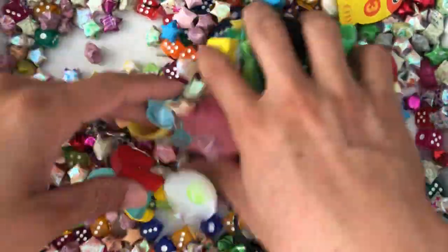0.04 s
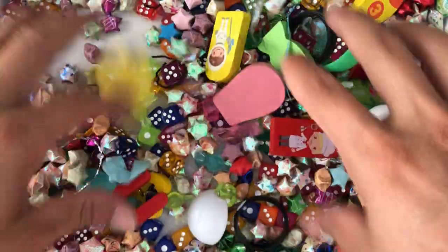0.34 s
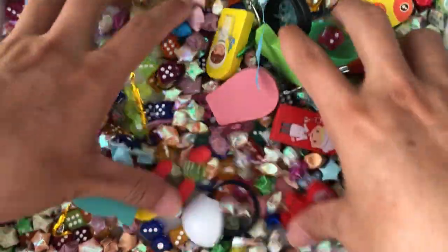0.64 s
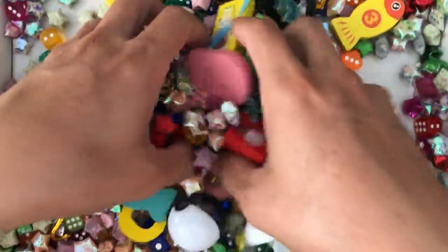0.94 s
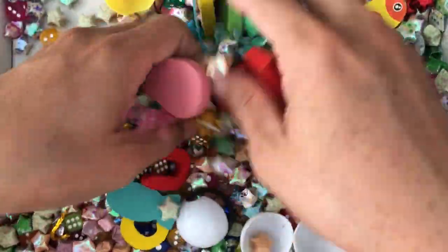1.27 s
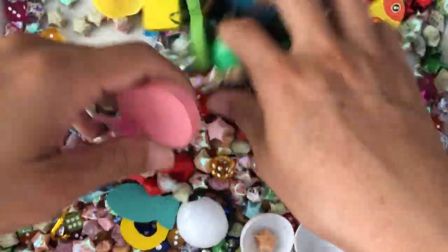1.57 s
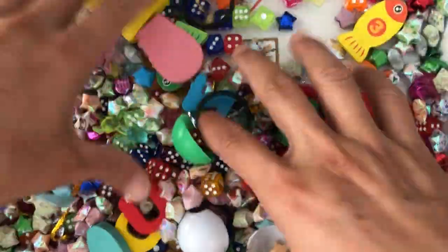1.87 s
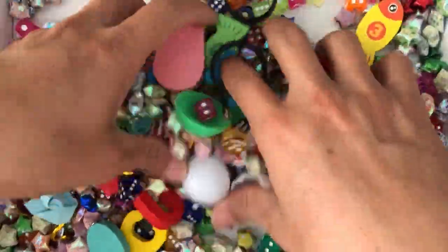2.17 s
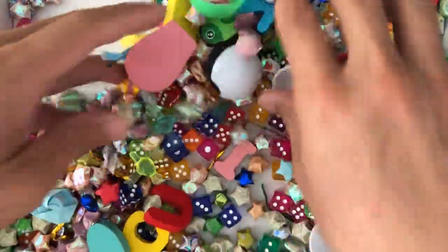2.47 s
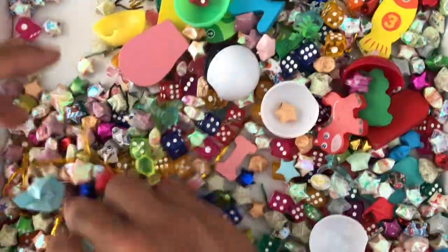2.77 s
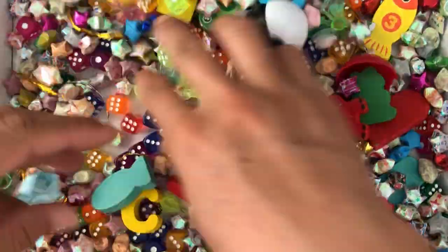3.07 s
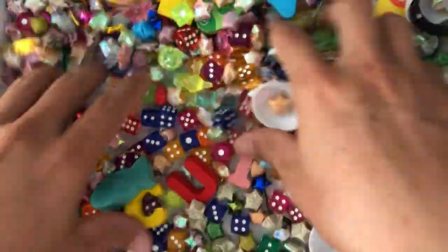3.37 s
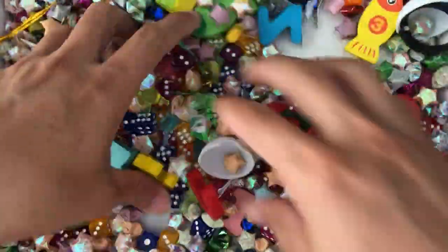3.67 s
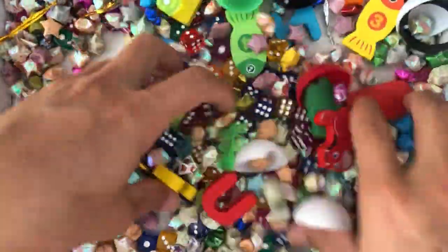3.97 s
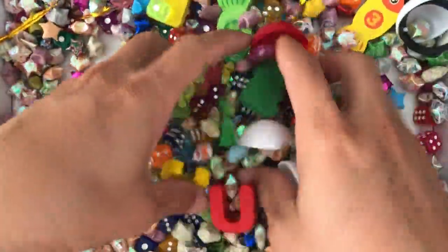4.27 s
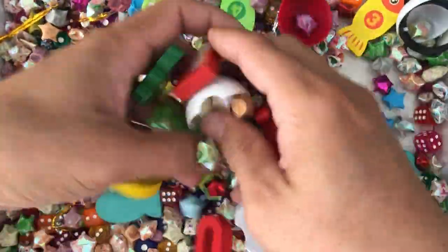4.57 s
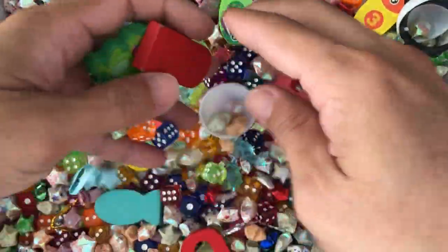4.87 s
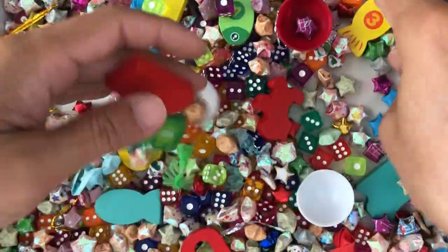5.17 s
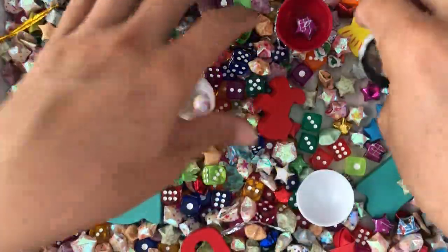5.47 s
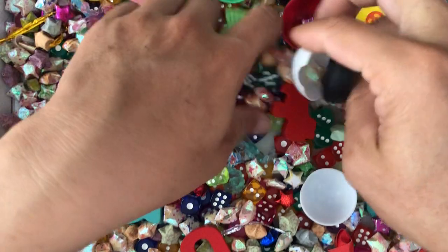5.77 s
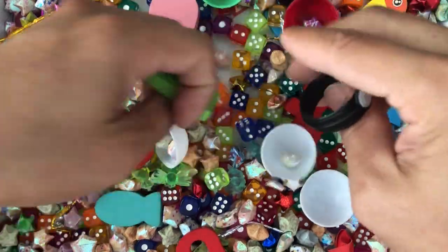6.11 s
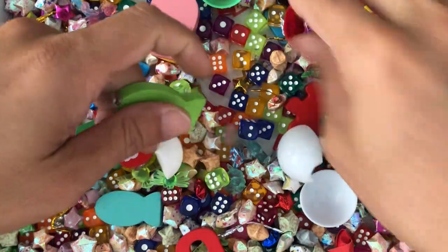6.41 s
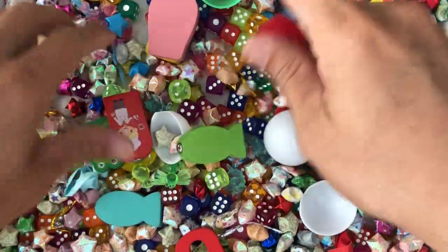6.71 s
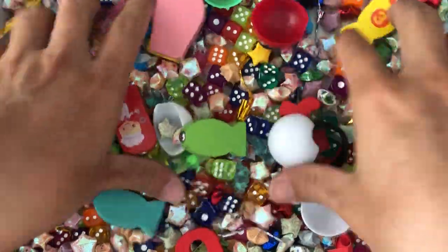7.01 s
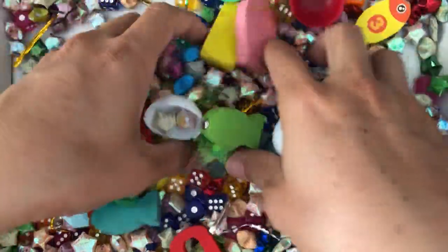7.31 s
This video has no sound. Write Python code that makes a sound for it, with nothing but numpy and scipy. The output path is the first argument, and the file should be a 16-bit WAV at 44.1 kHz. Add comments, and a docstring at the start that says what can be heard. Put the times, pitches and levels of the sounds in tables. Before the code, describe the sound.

Close, continuous rustling and clicking as small plastic trinkets and folded paper are rummaged through by hand in a shallow tray.

```python
"""Two hands stir folded paper stars, dice and plastic toys in a shallow tray, close to the microphone.
From the first stroke on, paper crinkles, plastic patters and clicks, and falling pieces knock on the tray.
At 1.8 s a hard piece pings and bounces. The clicks crowd together from 4.3 to 5.4 s.
Plastic squeaks faintly at 6.4 s; the last stroke crunches a star at 7.4 s.
A small room with a low ventilation drone lies behind throughout."""
import sys
import numpy as np
from scipy import signal
from scipy.io import wavfile
from scipy.ndimage import uniform_filter1d

SR = 44100
rng = np.random.default_rng(int(sys.argv[2]) if len(sys.argv) > 2 else 0)


def to_wav(sig):
    """Store sig (one row per channel, or 1-D mono) as 16-bit WAV at the path in sys.argv[1].

    Samples outside -1..1 are clipped; the rate is SR.
    """
    pcm = np.clip(np.atleast_2d(sig), -1, 1) * 32767
    pcm = np.round(pcm).astype(np.int16)
    wavfile.write(sys.argv[1], SR, pcm.T)  # frames by channels


N = 328545
TIME_S = np.arange(N) / SR
USUAL_EFFORT_DB = -53
GRAZE_LEAD_S = .003

# finger strokes: (start [s], length [s], effort [dB], push against the tray [dB])
FINGER_STROKES = [(0.01, 0.172, -51.5, -47.5), (0.172, 0.07, -59, -51.5), (0.327, 0.11, -68.5, -53.5),
                  (0.441, 0.23, -54, -47.5), (0.685, 0.13, -46.5, -46), (0.814, 0.058, -49.5, -49.5),
                  (0.895, 0.099, -45.5, -47.5), (1.088, 0.04, -56.5, -55), (1.135, 0.1, -49, -51),
                  (1.303, 0.061, -47.5, -44.5), (1.441, 0.51, -51.5, -48.5), (1.617, 0.1, -43.5, -44),
                  (1.718, 0.81, -55, -49.5), (2.028, 0.14, -50.5, -49.5), (2.173, 0.226, -48, -49),
                  (2.419, 0.05, -53, -50), (2.555, 0.06, -62, -52), (2.736, 0.05, -74, -54),
                  (2.811, 0.23, -51.5, -50.5), (2.956, 0.099, -52.5, -50.5), (3.133, 0.11, -65.5, -56.5),
                  (3.272, 0.1, -58.5, -53.5), (3.36, 0.09, -47, -48.5), (3.504, 0.075, -45, -52),
                  (3.577, 0.12, -50.5, -48), (3.733, 0.045, -60.5, -53.5), (3.907, 0.12, -48.5, -50.5),
                  (3.997, 0.17, -54, -47), (4.131, 0.099, -49.5, -47), (4.286, 0.14, -44.5, -45.5),
                  (4.438, 0.07, -47.5, -47), (4.602, 0.11, -57, -48), (4.745, 0.27, -54.5, -49),
                  (5.094, 0.077, -64, -58), (5.203, 0.13, -58, -56), (5.485, 0.31, -61, -57),
                  (5.711, 0.13, -49.5, -53), (5.887, 0.09, -53, -57.5), (6.067, 0.084, -64.5, -51.5),
                  (6.19, 0.16, -77.5, -54.5), (6.536, 0.042, -56, -53.5), (6.616, 0.083, -63, -54),
                  (6.805, 0.18, -67.5, -57), (6.957, 0.092, -62, -55.5), (7.079, 0.085, -48, -50),
                  (7.22, 0.66, -51, -47)]
# tray jostled under the heap: (frequency [Hz], gain [dB])
JOSTLE_SPECTRUM = [(100, -11), (330, -15.5), (410, -7.5), (490, -4.5), (560, -4), (610, 1.5), (690, -3.5),
                   (820, 3.5), (1100, 1.5), (1250, -1), (1400, -4.5), (1900, -11.5), (2600, -4.5),
                   (5000, -77)]
# pattering plastic: (frequency [Hz], gain [dB])
PATTER_SPECTRUM = [(600, -27), (1400, 3.5), (2200, -6.5), (2550, 4), (3100, 1), (3800, 0), (4800, -2.5),
                   (7000, -12), (16000, -24)]
# crinkling paper: (frequency [Hz], gain [dB])
CRINKLE_SPECTRUM = [(1200, -8), (3000, -13.5), (5000, -6.5), (6500, -3.5), (8500, -4), (11000, -8),
                    (15000, -11.5), (16000, -12.5)]
# loudest plastic collisions: (time [s], level [dB], pitch [Hz], chatter t60 [s])
PLASTIC_CLICKS = [(0.031, -40, 3000, 0.0048), (0.3644, -40, 3670, 0.0052), (0.468, -39.5, 3500, 0.0074),
                  (0.53, -39.5, 2920, 0.006), (0.6406, -41.5, 2910, 0.0053), (1.13, -42.5, 5550, 0.014),
                  (1.35, -38, 3480, 0.0062), (1.358, -38, 2920, 0.019), (1.4468, -44, 2640, 0.0046),
                  (1.468, -41, 3020, 0.006), (1.666, -32.5, 2600, 0.014), (1.7727, -33, 3300, 0.022),
                  (1.8384, -28, 5600, 0.011), (1.8399, -28.5, 4900, 0.0055), (1.921, -42, 3900, 0.006),
                  (2.3308, -35.5, 4830, 0.022), (2.3922, -37.5, 3900, 0.024), (2.551, -45, 3220, 0.01),
                  (2.5636, -36.5, 3470, 0.0055), (2.5806, -36.5, 3450, 0.006), (2.8543, -45, 2700, 0.011),
                  (3.1399, -44.5, 3220, 0.011), (3.2135, -42, 3030, 0.029), (3.266, -42, 3480, 0.019),
                  (3.6751, -40, 3630, 0.0044), (3.6925, -39, 2930, 0.006), (3.7467, -34, 2630, 0.027),
                  (4.3163, -37, 5800, 0.044), (4.4025, -32, 6100, 0.025), (4.4261, -34.5, 6240, 0.082),
                  (4.6549, -35, 6000, 0.017), (4.6979, -39.5, 4230, 0.026), (4.7608, -35, 5600, 0.0034),
                  (4.7664, -43, 4400, 0.0063), (4.7998, -37.5, 4240, 0.0071), (4.8439, -33.5, 3600, 0.0053),
                  (4.8635, -34, 3630, 0.0058), (4.8712, -39.5, 5100, 0.012), (4.921, -37, 3870, 0.0044),
                  (4.9636, -25, 3560, 0.0066), (4.981, -42, 3390, 0.011), (5.085, -39, 3800, 0.0018),
                  (5.0995, -31.5, 3870, 0.0025), (5.1228, -41, 3700, 0.012), (5.1384, -39, 4200, 0.0069),
                  (5.1667, -40, 3740, 0.0056), (5.1789, -50, 4200, 0.005), (5.191, -26.5, 3930, 0.012),
                  (5.2515, -37.5, 4080, 0.0018), (5.295, -41.5, 5330, 0.039), (5.35, -44, 4560, 0.018),
                  (5.6733, -38, 3160, 0.014), (5.8049, -35, 3860, 0.014), (5.9758, -37.5, 4040, 0.0068),
                  (6.0732, -27, 3460, 0.0095), (6.0738, -39, 2100, 0.008), (6.2903, -37, 3420, 0.0066),
                  (6.3162, -40.5, 3050, 0.019), (6.492, -41.5, 3840, 0.0023), (6.5813, -45.5, 3360, 0.0091),
                  (6.5919, -43.5, 3150, 0.0068), (6.649, -36.5, 3260, 0.003), (6.7, -47, 3610, 0.02),
                  (6.9833, -40, 3600, 0.003)]
# radiation of small plastic pieces: (frequency [Hz], gain [dB])
PLASTIC_SPECTRUM = [(200, -2), (1400, 6), (2100, 0.5), (2800, 1.5), (4700, -0.5), (5600, -0.5)]
# sharp contact: (frequency [Hz], gain [dB])
CONTACT_SPECTRUM = [(200, -12), (1000, -1.5), (4000, -6.5), (7500, -5), (11000, -5.5), (16000, -5.5)]
# heaviest drops on the tray: (time [s], relative level [dB], ring centre [Hz])
TRAY_KNOCKS = [(0.0573, -39.5, 750), (0.1332, -45, 980), (0.5298, -40.5, 1180), (0.7374, -36.5, 820),
               (1.3501, -36, 1080), (1.3578, -34, 1070), (1.4972, -37.5, 1010), (1.7246, -40, 1030),
               (2.6014, -41.5, 1260), (2.7987, -35.5, 556), (2.8538, -38.5, 840), (2.8794, -40, 940),
               (2.9961, -32, 750), (3.0557, -41.5, 730), (3.2915, -43, 664), (3.748, -37.5, 1240),
               (4.2238, -42, 980), (4.3907, -41, 1010), (4.4228, -38, 637), (4.4893, -37.5, 930),
               (4.6495, -33.5, 696), (4.6565, -31.5, 700), (4.6992, -33.5, 700), (4.8434, -41, 1160),
               (4.9087, -39.5, 1300), (4.9469, -38, 1040), (6.0733, -39.5, 930), (6.7872, -43.5, 696)]
# tray modes: (frequency [Hz], gain [dB], t60 [s])
TRAY_RESONANCES = [(389, -10.5, 0.053), (589, 3.5, 0.029), (805, -3.5, 0.048), (930, 5, 0.016),
                   (1160, -5, 0.024), (1404, 6.5, 0.017), (2070, -8, 0.02)]
# hard piece, struck and bouncing: (time [s], relative level [dB])
PING_BOUNCES = [(1.8386, -17), (1.8512, -38), (1.855, -47), (1.861, -30)]
# its modes: (frequency [Hz], gain [dB], t60 [s])
PING_MODES = [(4100, 0.5, 0.015), (6240, -2.5, 0.029), (6400, -22, 0.076), (7750, -6, 0.023)]
# loudest stars crushed or dragged: (time [s], relative level [dB], length [s])
STAR_CRUNCHES = [(0.6976, -43, 0.007), (0.777, -39.5, 0.0048), (1.6183, -37, 0.013), (1.7307, -45, 0.0086),
                 (2.8918, -40.5, 0.011), (3.5308, -47, 0.007), (4.826, -40, 0.005), (6.5324, -46, 0.009),
                 (7.372, -38, 0.04)]
# a whole star giving way: (frequency [Hz], gain [dB])
CRUNCH_SPECTRUM = [(800, -32), (2500, -6.5), (4500, -1), (6700, 5), (8500, 2), (11000, -1), (16000, -12)]
# tiny hard beads meeting: (time [s], level [dB])
BEAD_TICKS = [(0.031, -40), (0.124, -38), (0.695, -36), (1.2508, -40), (2.6012, -42), (3.2142, -41.5),
              (3.232, -40), (3.268, -42.5), (3.386, -33.5), (3.5052, -37), (4.4377, -39), (5.0176, -35),
              (5.098, -53), (5.1991, -38.5), (7.225, -40.5), (7.2395, -36)]
# plastic rubbing on plastic: (time [s], length [s], level [dB], pitch [Hz])
RUB_SQUEAK = (6.435, 0.055, -63, 1781)
# room decay: (frequency [Hz], t60 [s])
ROOM_DECAY = [(200, 0.25), (1000, 0.74), (4000, 0.071), (14000, 0.075)]
# ventilation: (frequency [Hz], gain [dB])
DRONE_SPECTRUM = [(40, -15), (100, -20.5), (135, -4), (165, 4), (225, -6), (275, 0), (335, -16), (400, -4),
                  (520, -14.5), (750, -6.5), (1200, -16.5), (2200, -42), (6000, -32), (16000, -34)]
# deep rumble: (frequency [Hz], gain [dB])
RUMBLE_SPECTRUM = [(22, -43), (30, -32), (40, -5.5), (47, 7), (55, 4), (66, -11), (100, 0.5), (130, -4),
                   (200, -29), (600, -75)]
# its envelope: (time [s], level [dB])
RUMBLE_LEVELS = [(0, -74), (0.4, -64.5), (1.1, -78), (1.35, -61), (1.8, -68.5), (2.7, -60), (2.95, -72),
                 (3.3, -64.5), (3.98, -64), (4.1, -76), (4.6, -63.5), (6.75, -64), (6.95, -77), (7.15, -78),
                 (7.3, -65)]


def heap(jostle_db, patter_db, crinkle_db):
    """Three contact streams: bumps on the tray, plastic taps, snapping paper."""
    bumps = contacts(jostle_db, rate_per_s=1000, slips_per_s=100, slip_db=1, slip_s=.002, creep=1.7,
                     spread_db=2, band_hz=(335, 2110), cycles=4.35)
    taps = contacts(patter_db, rate_per_s=1200, slips_per_s=120, slip_db=3.5, slip_s=.00067, creep=2.5,
                    spread_db=3, band_hz=(1334, 7770), cycles=25)
    folds, creases = (
        unit(contacts(crinkle_db, rate_per_s=2500, slips_per_s=110, slip_db=3.5, slip_s=.00088,
                      creep=1.9, spread_db=6, band_hz=band_hz, cycles=6.3))
        for band_hz in [(3000, 8900), (9500, 18600)])
    # gentle strokes lose the finest creases first
    dulling_db = .078 * np.minimum(crinkle_db - USUAL_EFFORT_DB, 0)
    snaps = folds + creases * amp(dulling_db)
    return (amp(.53) * follow(colour(bumps, JOSTLE_SPECTRUM), jostle_db)
            + amp(-1.56) * follow(colour(taps, PATTER_SPECTRUM), patter_db)
            + amp(.8) * follow(colour(snaps, CRINKLE_SPECTRUM), crinkle_db))


def contacts(level_db, rate_per_s, slips_per_s, slip_db, slip_s, creep, spread_db, band_hz, cycles):
    """Small pieces creep and slip in flurries of ringing contacts; hand pace scales the base rates."""
    pieces, t = 48, TIME_S[:SR // 50]
    pace = unit(amp(level_db)) ** .8
    slip_starts = rng.random(N) < slips_per_s * pace / SR
    slip_sizes = amp(slip_db * np.minimum(rng.exponential(1, N), 3))
    slips = signal.oaconvolve(slip_starts * slip_sizes, t * np.exp(-t / slip_s))[:N]
    motion = creep * pace ** .65 + unit(slips)
    sizes = motion * amp(spread_db * np.minimum(rng.exponential(1, N), 4)) * rng.choice([-1, 1], N)
    hits = sizes * (rng.random(N) < rate_per_s * np.sqrt(pace) * motion / SR)
    piece, out = rng.integers(0, pieces, N), np.zeros(N)
    for k, hz in enumerate(np.linspace(*band_hz, pieces)):
        out += signal.oaconvolve(hits * (piece == k), burst(ring([(hz, 1, cycles / hz)], t)))[:N]
    return out


def hands():
    """Push drives the jostle, effort the crinkle and, less steeply, the patter."""
    _, _, effort_db, push_db = np.transpose(FINGER_STROKES)
    jostle_db = stroke_envelope(push_db, rest_db=-66, settle_db_per_s=130.5)
    crinkle_db = stroke_envelope(effort_db, rest_db=-90, settle_db_per_s=239)
    patter_db = -51 + .44 * (crinkle_db - USUAL_EFFORT_DB)
    return jostle_db, patter_db, crinkle_db


def stroke_envelope(peaks_db, rest_db, settle_db_per_s, bite_db_per_s=405, ease_db_per_s=9):
    """Level [dB]: each stroke bites, eases, then settles to the slight stir of resting hands."""
    t, level_db = TIME_S[::64], rest_db
    for (start_s, length_s, *_), peak_db in zip(FINGER_STROKES, peaks_db):
        bite_db = bite_db_per_s * np.maximum(start_s - t, 0)
        ease_db = ease_db_per_s * np.clip(t - start_s, 0, length_s)
        settle_db = settle_db_per_s * np.maximum(t - start_s - length_s, 0)
        level_db = np.maximum(level_db, peak_db - bite_db - ease_db - settle_db)
    return np.interp(TIME_S, t, level_db)


def plastic_clicks(rows, cycles=8, scatter=.03, graze_s=.00038, usual_db=-36.5, usual_hz=3800):
    """A hard contact spits treble and rings four quickly damped plastic modes."""
    out, t = np.zeros(N), TIME_S[:SR // 25]
    for time_s, db, hz, t60_s in rows:
        detune = np.exp(scatter * rng.standard_normal(4) * [1, 0, 1, 1])
        modes_hz = hz * np.array([.77, 1, 1.2, 1.6]) * detune
        shell = ring(zip(modes_hz, [-.43, .84, -.72, -.031], cycles / modes_hz), t)
        force = chatter(t, t60_s, graze_s, firmness=8)
        body = colour(signal.fftconvolve(force, shell), PLASTIC_SPECTRUM)
        crack = colour(chatter(t, t60_s + .003, graze_s, firmness=4), CONTACT_SPECTRUM)
        # harder blows and smaller, higher pieces spit more treble
        crack_db = -43.5 + .54 * (db - usual_db) + 11 * np.log2(hz / usual_hz)
        add(out, time_s - GRAZE_LEAD_S, amp(db) * burst(body))
        add(out, time_s - GRAZE_LEAD_S, amp(crack_db) * burst(crack))
    return out


def chatter(t, t60_s, graze_s, firmness):
    """Two surfaces graze, meet in one blow at GRAZE_LEAD_S and chatter to rest."""
    since_s = t - GRAZE_LEAD_S
    envelope = np.exp(np.minimum(since_s, 0) / graze_s) * amp(-60 * np.maximum(since_s, 0) / t60_s)
    blow = firmness * signal.unit_impulse(len(t), np.argmin(abs(since_s)))
    return rng.choice([-1, 1], len(t)) * envelope + blow


def tray_knocks(rows, width_octaves=.47, scatter=.048):
    """A falling piece rings the tray's modes around a centre set by its weight and landing spot."""
    out, t = np.zeros(N), TIME_S[:SR // 12]
    modes_hz, modes_db, t60_s = np.transpose(TRAY_RESONANCES)
    for time_s, db, centre_hz in rows:
        hz = modes_hz * (1 + scatter * rng.standard_normal(len(modes_hz)))
        excitation = 1 / (1 + (np.log2(hz / centre_hz) / width_octaves) ** 2)
        gains = amp(modes_db) * excitation * rng.choice([-1, 1], len(hz))
        add(out, time_s, amp(db) * burst(ring(zip(hz, gains, t60_s), t)))
    return colour(out, [(100, -1), (300, 2.5), (500, 2.5)])  # a small tray radiates little bass


def hard_piece(gain_db=-5.5):
    """A bright ping, renewed at each bounce."""
    out = np.zeros(N)
    ping = ring([(hz, amp(db), t60_s) for hz, db, t60_s in PING_MODES], TIME_S[:SR // 5])
    for time_s, db in PING_BOUNCES:
        add(out, time_s, amp(db + gain_db) * ping)
    return out


def star_crunches(rows, gain_db=2.5):
    """Creased paper stutters briefly as it gives way."""
    out, t = np.zeros(N), TIME_S[:SR // 25]
    for time_s, db, length_s in rows:
        stutter = rng.laplace(size=len(t)) * t / length_s * np.exp(-3.2 * t / length_s)
        add(out, time_s, amp(db + gain_db) * burst(colour(stutter, CRUNCH_SPECTRUM)))
    return out


def bead_ticks():
    """Beads too small to ring give only the sharp contact."""
    out, t = np.zeros(N), TIME_S[:SR // 25]
    for time_s, db in BEAD_TICKS:
        force = chatter(t, t60_s=.0049, graze_s=.00048, firmness=4)
        add(out, time_s - GRAZE_LEAD_S, amp(db) * burst(colour(force, CONTACT_SPECTRUM)))
    return out


def plastic_squeak(waver=.028):
    """Two pieces rub: a thin, wavering tone swells and fades."""
    time_s, length_s, db, hz = RUB_SQUEAK
    out, t = np.zeros(N), np.arange(0, length_s, 1 / SR)
    drift = unit(uniform_filter1d(rng.standard_normal(SR), size=200))[:len(t)]
    tone = np.sin(2 * np.pi * np.cumsum(hz * (1 + waver * drift)) / SR)
    add(out, time_s, amp(db) * unit(np.sin(np.pi * t / length_s) * tone))
    return out


def strays(level_db, over_db, ranges, count, spread_db=6):
    """Chance events riding on a stream: (time [s], level [dB], one draw per (low, high) range)."""
    draws = rng.random((count, 2 + len(ranges)))
    onsets = ((np.arange(count) + draws[:, 0]) / count * (N - 1)).astype(int)
    events_db = level_db[onsets] + over_db + spread_db * (draws[:, 1] - .5)
    low, high = np.transpose(ranges)
    columns = low + (high - low) * draws[:, 2:]
    return list(zip(onsets / SR, events_db, *columns.T))


def room(x, early_db=-16, early_t60_s=.027, tail_db=-22, echoes_per_s=4000):
    """Quick reflections off hands and tray, then a faint tail from the walls."""
    t = TIME_S[:SR // 2]
    echoes = rng.standard_normal(len(t)) * (rng.random(len(t)) < echoes_per_s / SR)
    hz, frames_s, spectra = signal.stft(echoes * (t > .006), SR, nperseg=256)
    decay = amp(-60 * frames_s / value_at(ROOM_DECAY, hz)[:, None])
    tail = signal.istft(spectra * decay, SR, nperseg=256)[1][:len(t)]
    early = echoes * (t > .0008) * amp(-60 * t / early_t60_s)
    response = amp(early_db) * early / np.linalg.norm(early) + amp(tail_db) * tail / np.linalg.norm(tail)
    return signal.oaconvolve(x, response)[:N]


def ventilation(drone_db=-60):
    """Steady ventilation noise over a deep, uneven rumble."""
    rumble_db = np.interp(TIME_S, *np.transpose(RUMBLE_LEVELS))
    rumble = unit(colour(rng.standard_normal(N), RUMBLE_SPECTRUM))
    drone = unit(colour(rng.standard_normal(N), DRONE_SPECTRUM))
    return amp(rumble_db) * rumble + amp(drone_db) * drone


def ring(modes, t):
    """Damped sines with a half-cycle rise; modes: (frequency [Hz], gain, t60 [s])."""
    return sum(gain * np.sin(2 * np.pi * hz * t) * (1 - np.exp(-2 * hz * t)) * amp(-60 * t / t60_s)
               for hz, gain, t60_s in modes)


def follow(x, level_db):
    """Levels x to level_db over about 0.1 s, keeping its fine grain."""
    power = uniform_filter1d(uniform_filter1d(unit(x) ** 2, size=2200), size=2200)
    return unit(x) * amp(level_db) / np.sqrt(abs(power) + 1e-4)


def colour(x, spectrum, size=4096):
    """Minimum-phase filter; attacks stay sharp."""
    log_gain = np.log(amp(value_at(spectrum, abs(np.fft.fftfreq(size, 1 / SR)))))
    taps = np.fft.ifft(np.exp(np.conj(signal.hilbert(log_gain)))).real
    return signal.oaconvolve(x, taps[:size // 2])[:len(x)]


def value_at(points, hz):
    """Interpolates over log frequency."""
    points_hz, values = np.transpose(points)
    return np.interp(np.log(hz + 1), np.log(points_hz + 1), values)


def amp(db):
    """Decibels to gain."""
    return 10 ** (np.asarray(db) / 20)


def unit(x):
    """Scales to unit rms."""
    return x / np.sqrt(np.mean(x ** 2) + 1e-20)


def burst(x):
    """Scales to the energy of 5 ms at unit rms."""
    return x * np.sqrt(.005 * SR / np.sum(x ** 2))


def add(mix, time_s, sound):
    """Mixes a sound in at time_s."""
    part = mix[max(round(time_s * SR), 0):][:len(sound)]
    part += sound[:len(part)]


def scene():
    """The heap, its loudest pieces and lesser ones shaken loose, in the room; mono."""
    jostle_db, patter_db, crinkle_db = hands()
    small_clicks = strays(patter_db, over_db=2, ranges=[(2700, 4400), (.004, .036)], count=36)
    small_knocks = strays(jostle_db, over_db=5.5, ranges=[(750, 2200)], count=24)
    small_crunches = strays(crinkle_db, over_db=2.5, ranges=[(.003, .013)], count=30)
    near = (heap(jostle_db, patter_db, crinkle_db) + star_crunches(STAR_CRUNCHES + small_crunches)
            + bead_ticks() + plastic_clicks(PLASTIC_CLICKS + small_clicks)
            + tray_knocks(TRAY_KNOCKS + small_knocks) + hard_piece() + plastic_squeak())
    return (near + room(near) + ventilation())[None]


def record(dry, cutoff_hz=16000):
    """Low-pass band limit."""
    lowpass = signal.firwin(401, cutoff_hz, window=("kaiser", 8), fs=SR)
    return signal.oaconvolve(dry, lowpass[None], "same")


dry = scene()
out = record(dry)
to_wav(out)
```